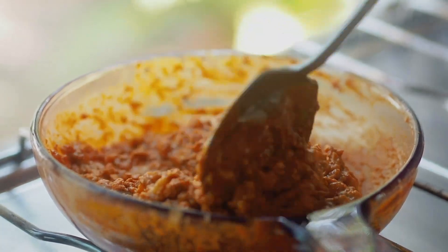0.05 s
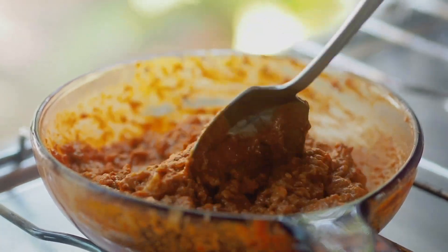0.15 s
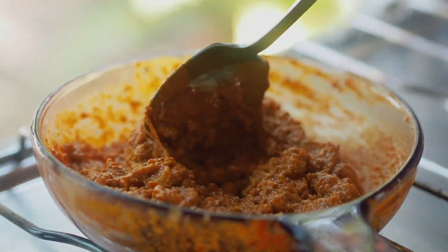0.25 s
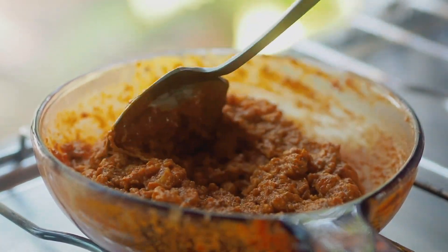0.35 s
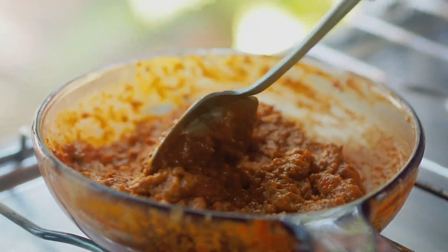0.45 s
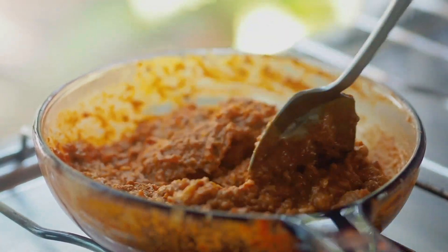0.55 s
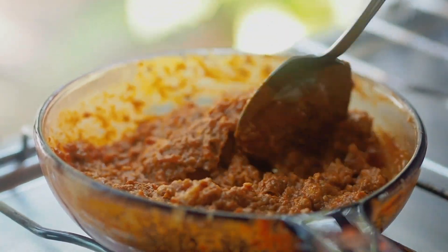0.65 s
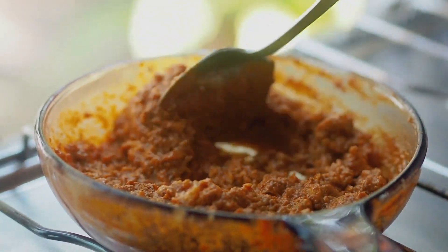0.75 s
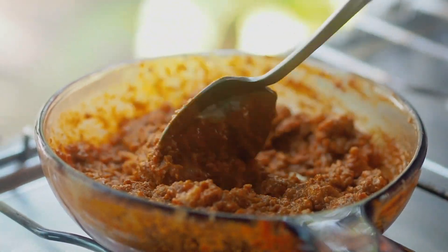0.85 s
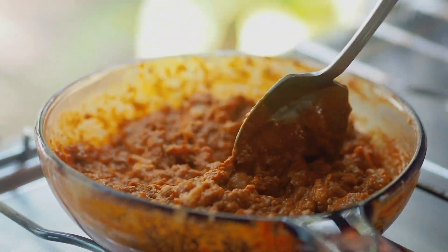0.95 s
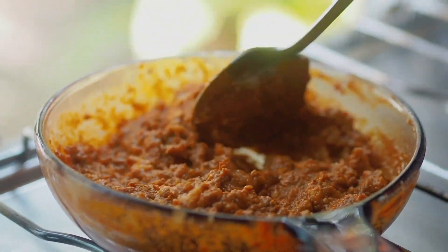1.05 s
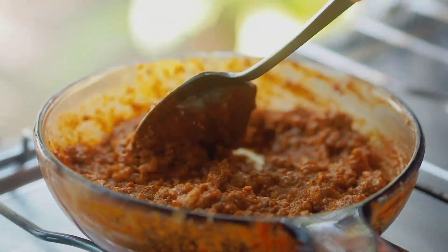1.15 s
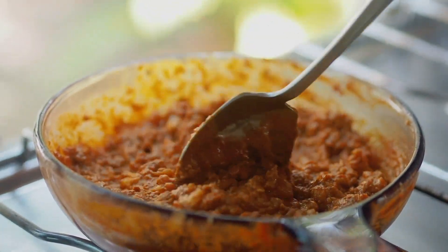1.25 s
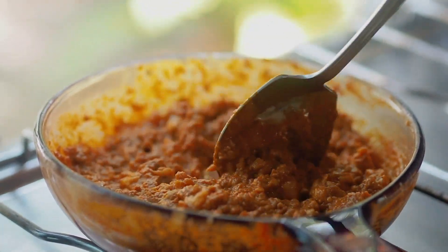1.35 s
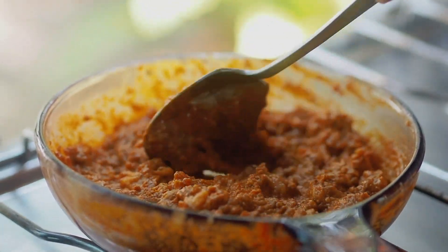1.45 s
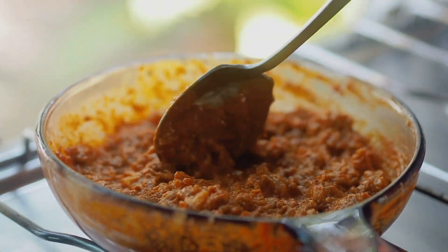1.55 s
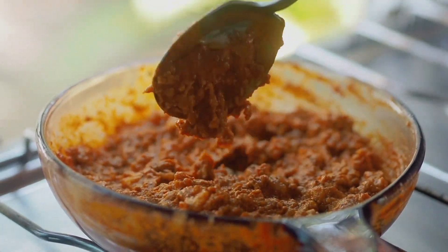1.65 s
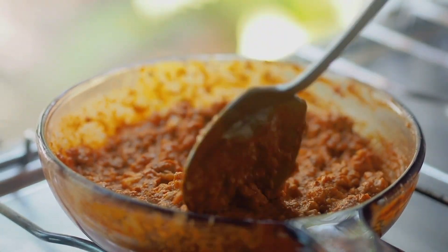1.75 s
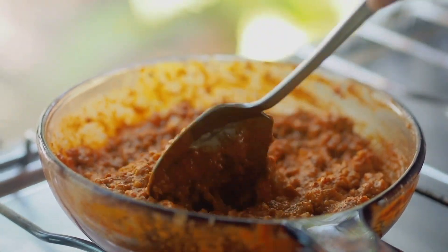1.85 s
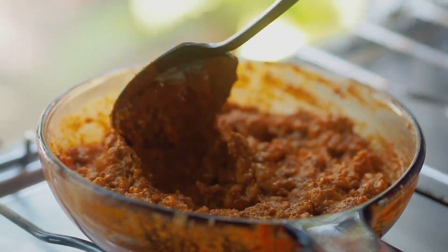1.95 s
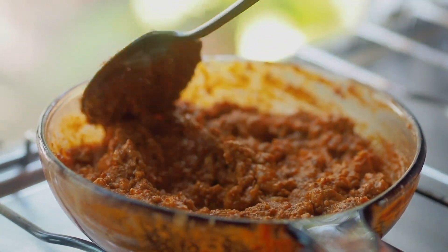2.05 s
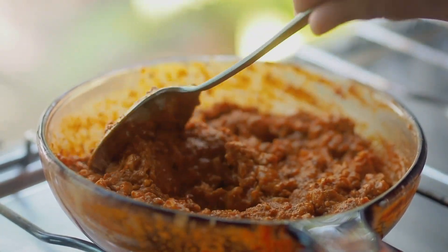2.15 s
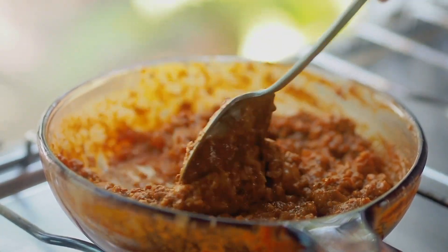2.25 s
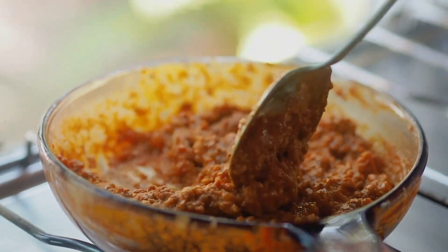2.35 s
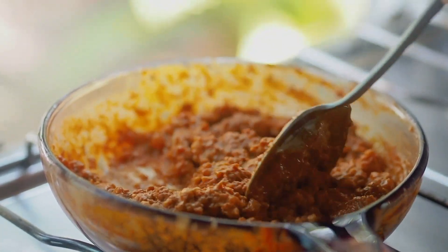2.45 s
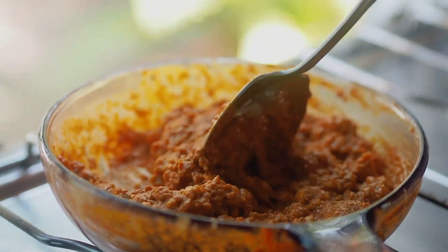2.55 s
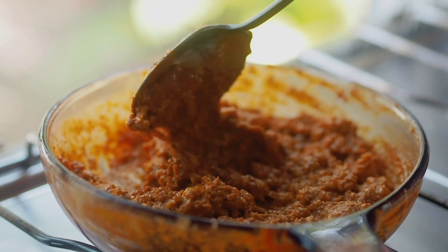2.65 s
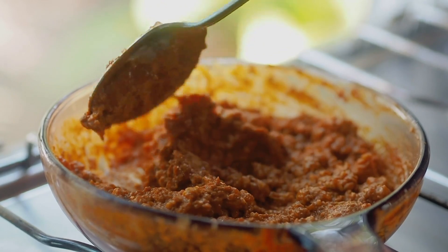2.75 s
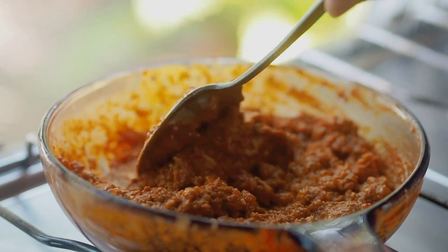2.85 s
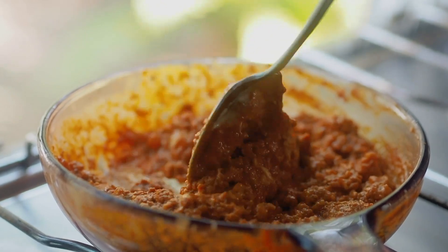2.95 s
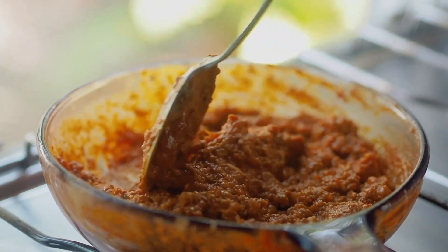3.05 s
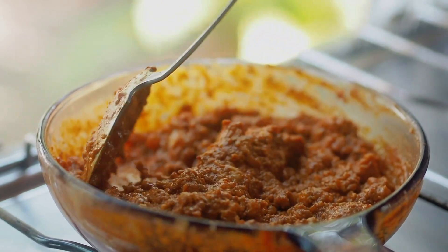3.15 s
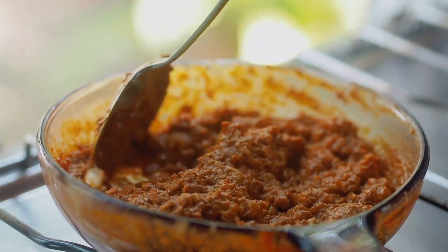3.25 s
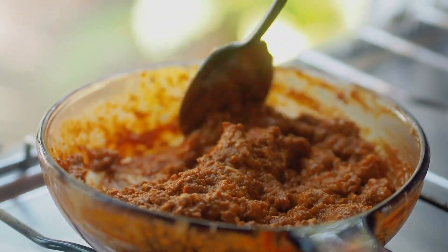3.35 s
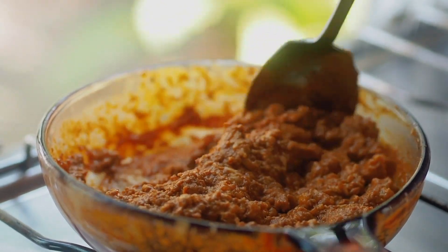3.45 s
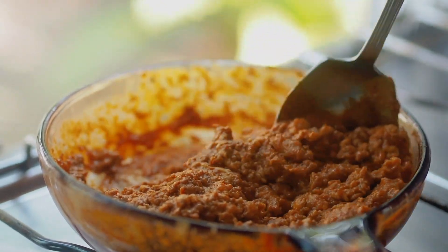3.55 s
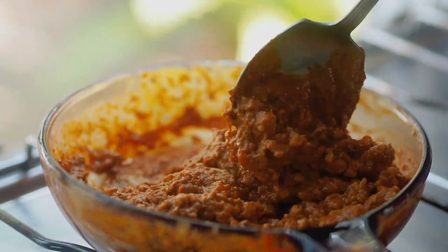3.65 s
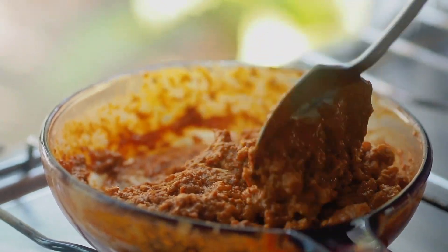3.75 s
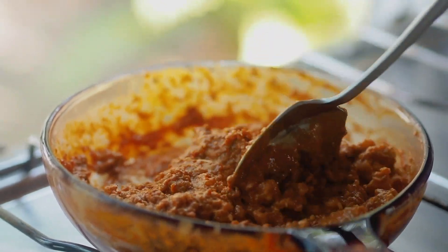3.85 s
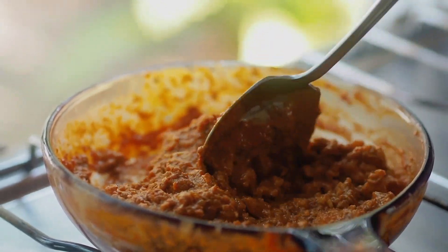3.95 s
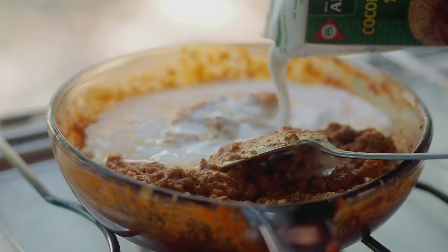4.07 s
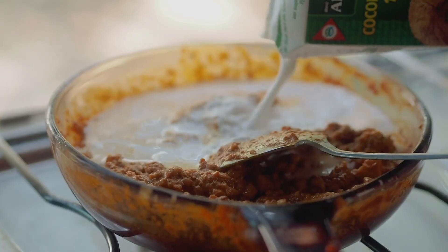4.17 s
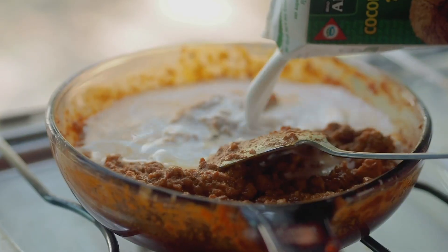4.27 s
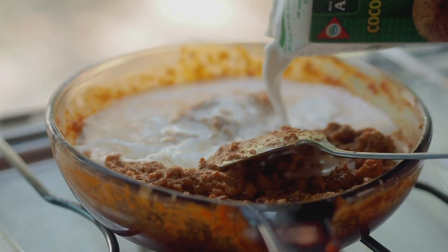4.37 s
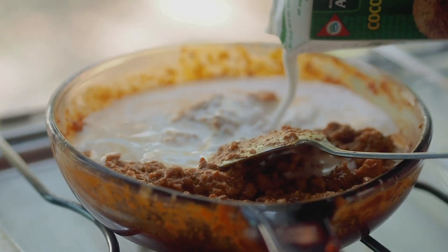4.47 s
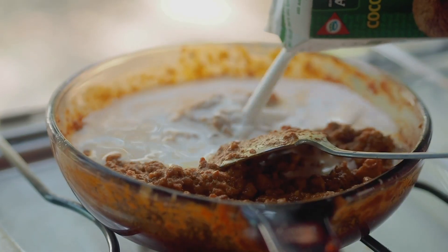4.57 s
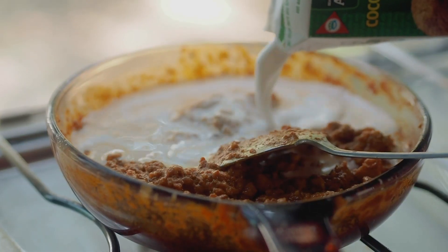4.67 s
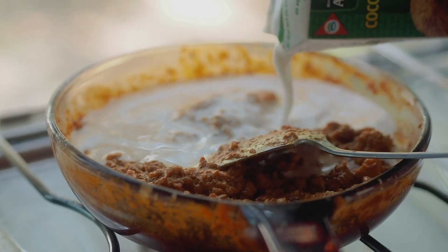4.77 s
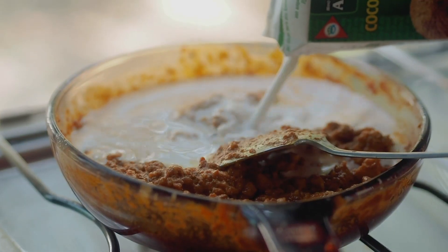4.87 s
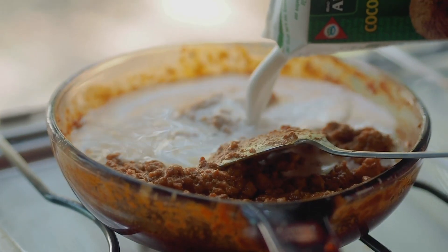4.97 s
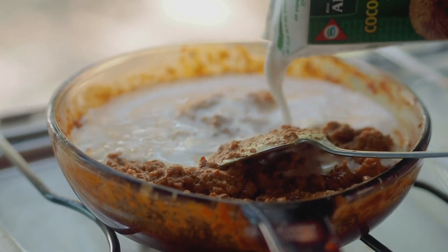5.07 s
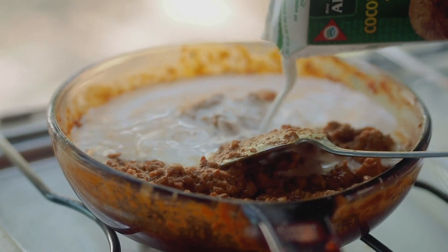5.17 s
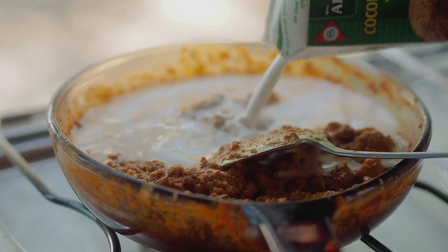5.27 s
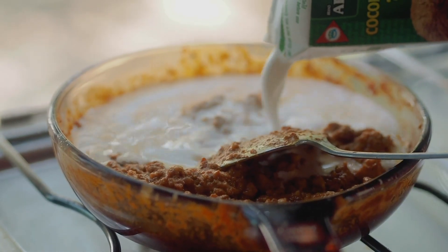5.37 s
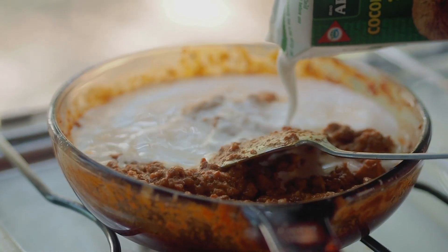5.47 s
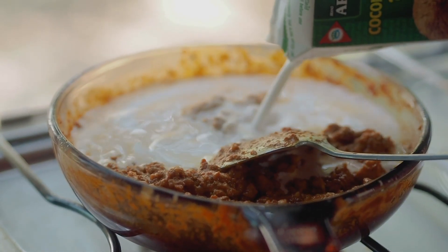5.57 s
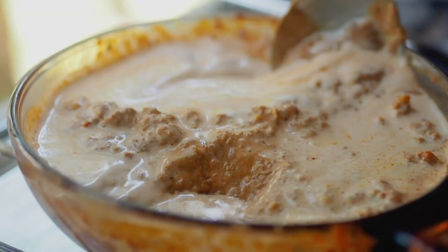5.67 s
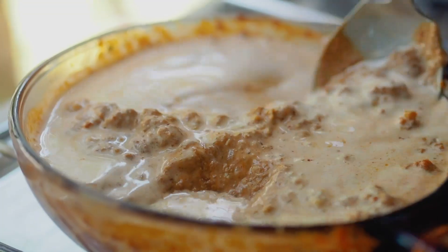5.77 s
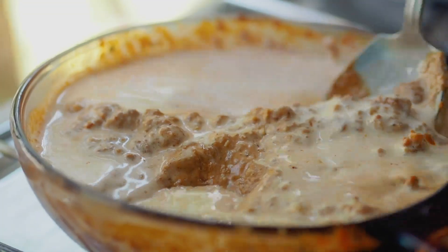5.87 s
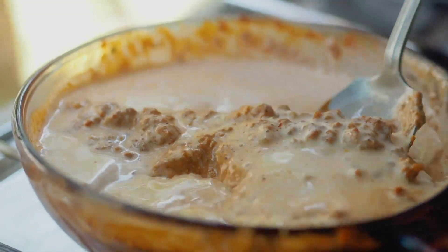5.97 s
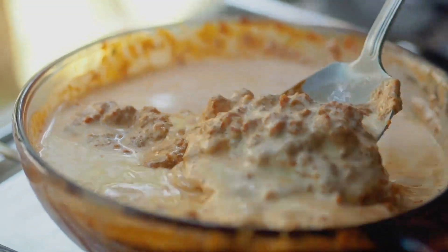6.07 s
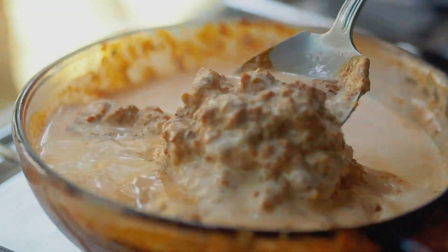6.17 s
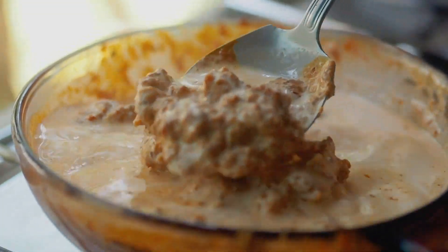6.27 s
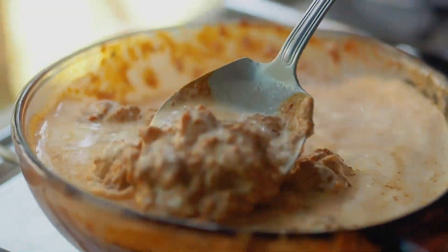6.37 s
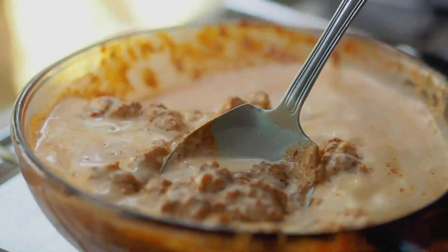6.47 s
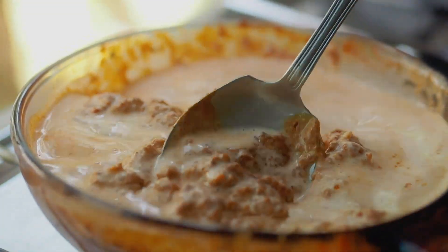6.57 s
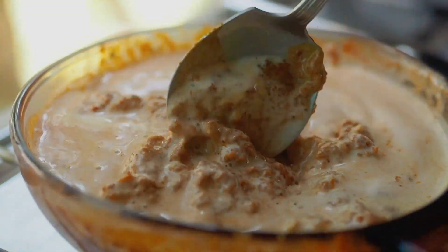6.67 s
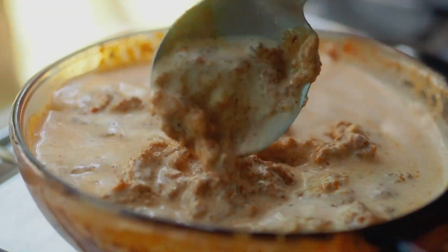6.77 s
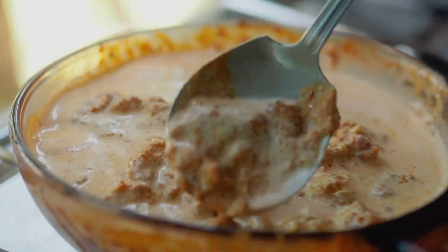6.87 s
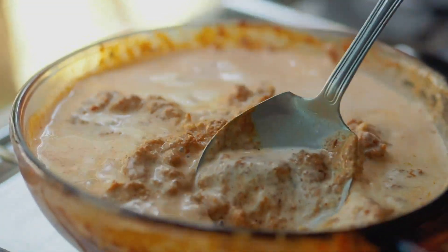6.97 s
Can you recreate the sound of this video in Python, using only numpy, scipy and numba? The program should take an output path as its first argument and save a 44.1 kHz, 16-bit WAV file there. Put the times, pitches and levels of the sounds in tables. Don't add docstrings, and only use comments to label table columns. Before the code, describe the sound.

In a small kitchen, closely heard in stereo, a gas burner hisses softly with a low flame rumble throughout. A metal spoon strikes a paste-filled glass bowl hard at 0.2 s, again at 0.4 and more softly at 0.6; the rings are bright but quickly damped, with a dull low thud. From 0.5 to 1.3 s, soft touches and gritty scrapes follow, with a squeak near 0.8. A bright double clank comes at 1.5, then strong knocks at 1.87, 2.17, 2.5 and 2.9, the 1.87 one especially thuddy, the last trailing a scrape. Weaker knocks fall at 3.25, a quick cluster at 3.5, and a light one at 3.9. Afterwards there is mostly burner hiss, with faint scrapes around 4.9, 5.3 and 6.4, barely audible touches at 5.5 and 5.8, and a tiny rim tick at 7.0. Room echo is short.

```python
import sys
import numpy as np
from scipy import signal
from scipy.fft import rfft, irfft, next_fast_len
from scipy.io import wavfile
from scipy.ndimage import map_coordinates
from numba import njit

SR = 44100
rng = np.random.default_rng(int(sys.argv[2]) if len(sys.argv) > 2 else 0)


def dump(signal):
    limited = np.clip(np.atleast_2d(signal).T, -1, 1)
    pcm = np.round(limited * 32767).astype(np.int16)
    wavfile.write(sys.argv[1], SR, pcm)


def field_ratio(decibels):
    return 10 ** (np.asarray(decibels, dtype=float) / 20)


N = 309582
DELAY_S = 0.0008
SIDES = np.array([[1], [-1]])


def rms_one(x):
    return x / np.sqrt(np.mean(x ** 2) + 1e-20)


def at_hz(points, hz):
    point_hz, point_db = np.transpose(points)
    return np.interp(np.log(hz), np.log(point_hz), point_db)


def drift(rate_hz):
    steps = rng.standard_normal(int(N / SR * rate_hz) + 3)
    return rms_one(map_coordinates(steps, [np.arange(N) / SR * rate_hz], order=3))


def band(x, low_hz, high_hz):
    edges = [low_hz, min(high_hz, 0.45 * SR)]
    return signal.sosfilt(signal.butter(2, edges, "band", fs=SR, output="sos"), x)


def high_pass(x, order, hz):
    return signal.sosfilt(signal.butter(order, hz, "high", fs=SR, output="sos"), x)


def decay(db, hz, t60_s, rise_s):
    t = np.arange(SR // 3) / SR
    envelope = field_ratio(db - 60 * t / t60_s) * (1 - np.exp(-t / rise_s))
    return envelope * np.sin(2 * np.pi * hz * t)


def dying_noise(rows, fall_s):
    t = np.arange(SR // 3) / SR
    return rng.standard_normal((rows, len(t))) * np.exp(-t / fall_s)


def add(out, s, sound):
    i = round(s * SR)
    out[i:i + len(sound)] += sound[:N - i]


def low_noise():
    return field_ratio([[-86], [-81]]) * rms_one(band(rng.standard_normal((2, N)), 36, 100))


# frequency_hz, likeness (0-1)
COHERENCE = [(60, 1), (180, 0.95), (550, 0.88), (1650, 0.63), (4970, 0.29), (15000, 0.02)]
# frequency_hz, difference_db
BALANCE = [(60, -0.5), (240, 0.5), (950, -0.5), (3770, -0.5), (15000, -2)]


def gas_noise(spectrum):
    size = next_fast_len(N)
    hz = np.maximum(np.arange(size // 2 + 1) * SR / size, 1)
    inside = (hz > spectrum[0][0]) & (hz < spectrum[-1][0])
    alike = np.clip(at_hz(COHERENCE, hz), 0, 1)
    mid, side = rfft(rng.standard_normal((2, size)))
    pair = np.sqrt(1 + alike) * mid + np.sqrt(1 - alike) * side * SIDES
    gain = inside * field_ratio(at_hz(spectrum, hz) + at_hz(BALANCE, hz) * SIDES / 2)
    return rms_one(irfft(gain * pair, size)[:, :N])


# time_s, level_db
GAS_FLOW = [
    (0, -1),
    (.3, 2),
    (2, 0.5),
    (4, 0),
    (5.2, -1),
    (5.6, .5),
    (7.02, 0),
]
# frequency_hz, density_db (dB per Hz)
FLAME_SPECTRUM = [(15, -50), (25, -19), (54, -23), (75, -23.5), (134, -11.5), (175, -3.5), (324, -18),
                  (357, -13), (386, -11.5), (589, -8.5), (818, -12), (1350, -13.5), (1570, -18.5),
                  (1840, -12), (2500, -18.5), (3250, -39), (5500, -120)]
# frequency_hz, density_db (dB per Hz)
JET_SPECTRUM = [(1470, -81), (2500, -8), (3290, -4), (3710, -4.5), (4920, -7), (5810, -1), (6230, -13.5),
                (7350, -10.5), (7890, -14.5), (9240, -8.5), (10600, -25), (11900, -10.5), (13700, -8),
                (16000, -20.5), (16400, -60)]


def burner():
    flow_db = np.interp(np.arange(N) / SR, *np.transpose(GAS_FLOW))
    flame = field_ratio(-58.5 + 0.17 * flow_db + 0.11 * drift(8.5)) * gas_noise(FLAME_SPECTRUM)
    jet = field_ratio(-54.5 + flow_db + 0.77 * drift(5))
    whistle_hz, half_width_hz = 5993, 130
    common, left, right = rng.standard_normal((3, N))
    mixed = common + 0.88 * np.array([left, right])
    whistle = rms_one(band(mixed, whistle_hz - half_width_hz, whistle_hz + half_width_hz))
    return flame + jet * (gas_noise(JET_SPECTRUM) + field_ratio(-7 + 0.5 * drift(3.9)) * whistle)


# low_hz, high_hz, level_db, t60_s, side_share (ratio, differs between the sides)
REVERBERATION = [
    (298, 1350, -11.5, 0.39, 0.31),
    (1600, 2820, -14, 0.19, 0.85),
    (3300, 5930, -15, 0.21, 0.78),
    (7650, 50000, -16.5, 0.2, 1.13),
]


def kitchen(x):
    t = np.arange(SR // 2) / SR
    response = np.zeros((2, len(t)))
    response[:, 0] = field_ratio([-0.4, 0.4])
    mid, side = rng.standard_normal((2, len(t)))
    response += field_ratio(-29) * band(side, 1200, 16000) * t / 0.00076 * np.exp(1 - t / 0.00088) * SIDES
    for k, (low_hz, high_hz, db, t60_s, side_share) in enumerate(REVERBERATION):
        noise = band(mid + side_share * side * SIDES, low_hz, high_hz)
        tail = noise * field_ratio(db - 20 - 60 * t / t60_s) * (1 - np.exp(-t / 0.0006))
        response += (-1) ** k * tail
    return signal.fftconvolve(x[None], response, axes=1)[:, :N]


# start_s, level_db
LOW_THUMPS = [
    (0.175, -32),
    (0.405, -50),
    (1.863, -68),
    (2.512, -65),
    (2.882, -49),
]


def thumps():
    out, t = np.zeros(N), np.arange(SR // 20) / SR
    push_s = 0.001
    for s, db in LOW_THUMPS:
        add(out, s + DELAY_S, -field_ratio(db - 3.5) * t / push_s * np.exp(1 - t / push_s))
    return out


# start_s, level_db
STAND_HUMS = [(0.202, -49), (0.663, -55), (1.128, -56.5), (1.88, -52), (2.19, -65.5), (2.529, -53),
              (2.568, -52.5), (2.907, -57), (3.279, -68), (3.557, -54)]


def stand():
    out = np.zeros(N)
    for s, db in STAND_HUMS:
        add(out, s, decay(db + 12, 368.3, 0.067, 0.0057))
    return out


LOW_MODES = [829, 739, 896, 989, 1060, 1147, 1337, 1470]
# start_s, level_db, pitch_hz, other_modes_db
BELLY_RINGS = [(0.176, -20.5, 1125, 1.5), (0.408, -26, 1125, -5.5), (0.627, -34.5, 903, 3.5),
               (0.775, -47, 1150, 0), (0.975, -35.5, 880, -11), (1.134, -34.5, 1096, -15),
               (1.502, -35, 980, -3.5), (1.531, -33, 1145, -2), (1.865, -18, 1170, 0),
               (2.176, -14.5, 1158, -10), (2.514, -22, 953, -7.5), (2.885, -27, 990, 0.5),
               (3.255, -31, 857, 5.5), (3.472, -26, 1118, -7.5), (3.503, -31, 1017, -1),
               (3.541, -34.5, 862, 0.5), (3.894, -41, 940, -1.5), (5.77, -42.5, 940, -2.5)]
# start_s, level_db, pitch_hz, t60_s
STRUCK_RINGS = [
    (.18, -26, 863, 0.076),
    (1.136, -32, 1155, 0.072),
    (1.502, -12, 2630, 0.036),
    (1.53, -17, 2586, 0.062),
    (2.885, -27.5, 1465, 0.044),
    (3.258, -29, 1950, 0.046),
    (3.258, -21, 2840, 0.044),
    (3.541, -31.5, 1877, 0.064),
    (3.891, -24, 2260, 0.022),
]
# start_s, level_db, pitch_hz, t60_s
DEEP_RINGS = [
    (1.868, -24.5, 700, 0.24),
    (1.87, -4, 804, 0.044),
    (2.174, -23.5, 625.5, 0.13),
    (2.515, -46, 765, 0.11),
    (2.882, -58, 650, 0.067),
    (3.259, -48, 776, 0.1),
    (3.475, -33, 693, 0.18),
]


def belly():
    out, hz = np.zeros(N), np.array(LOW_MODES)[:, None]
    strengths = rng.standard_normal((len(BELLY_RINGS), len(hz), 1))
    slaps = band(dying_noise(len(BELLY_RINGS), 0.0092), 554, 1020)
    for (s, db, ring_hz, others_db), strength, slap in zip(BELLY_RINGS, strengths, slaps):
        main = decay(db + 5, ring_hz, 0.028, 0.0035)
        others = np.sign(strength) * decay(db + others_db - 10 + 3 * np.abs(strength), hz, 0.056, 0.0027)
        add(out, s, main + others.sum(axis=0) + field_ratio(db + others_db) * slap)
    for s, db, ring_hz, t60_s in STRUCK_RINGS:
        add(out, s, decay(db, ring_hz, t60_s, 0.00097))
    for s, db, ring_hz, t60_s in DEEP_RINGS:
        add(out, s, decay(db - 7.5, ring_hz, t60_s, 0.0088))
    return high_pass(out, 6, 560)


@njit
def gliding(x, hz, r, rate):
    y = np.zeros(len(x))
    for i in range(2, len(x)):
        feedback = 2 * r * np.cos(2 * np.pi * hz[i] / rate) * y[i - 1] - r * r * y[i - 2]
        y[i] = x[i] - x[i - 2] + feedback
    return y


DEEP_STROKES = [(.448, -46, 2300, 0.0087, 0.28), (.584, -40, 2020, 0.043, .1),
                (.618, -42, 2020, 0.018, .005), (.667, -40, 2060, 0.0077, 0.028),
                (.748, -43.5, 2150, 0.042, 0.064), (.885, -40.5, 2930, 0.014, 0.11),
                (.915, -42, 2830, .08, .07), (.997, -44, 2180, .01, 0.06), (1.014, -42.5, 2080, .02, 0.031),
                (1.096, -36.5, 2040, 0.013, 0.025), (1.24, -38, 2880, 0.046, .05),
                (1.497, -34.5, 2740, 0.047, .004), (2.57, -37.5, 2380, .015, .1),
                (3.568, -45, 1940, 0.011, 0.086)]
DOWN_STROKES = [
    (.895, -53, 3300, .05, 0.04),
    (.812, -40.5, 5060, .03, 0.037),
    (.834, -31.5, 4220, 0.04, 0.035),
    (1.42, -51.5, 4480, 0.13, .05),
    (1.78, -47, 4740, 0.062, 0.071),
    (1.855, -47, 3840, 0.078, .008),
    (4.25, -56.5, 4040, .08, .2),
]
ALONG_STROKES = [
    (2.9, -30, 4150, .015, 0.24),
    (0.1515, -46, 4100, 0.038, .005),
    (.88, -36, 3980, .03, 0.045),
    (1.81, -40, 4100, 0.025, 0.39),
    (0.9, -46, 3100, .2, .06),
    (5.292, -42.5, 4150, 0.021, 0.091),
    (5.32, -48, 5100, .05, 0.13),
    (4.9, -51, 4050, 0.057, 0.07),
    (6.435, -46.5, 4360, 0.057, 0.15),
]
SINGING_STROKES = [
    (1.51, -39, 2640, .01, .08),
    (1.54, -39, 2550, .03, 0.12),
    (3.898, -64, 2140, .01, 0.041),
]


def scrapes(strokes, sag_hz_per_s, slips_per_s, width_hz, skirt_db, size_db):
    t, level, hz = np.arange(N) / SR, np.zeros(N), np.full(N, 3000.)
    for s, db, centre_hz, swell_s, fall_s in strokes:
        late = t - s
        away = np.where(late < 0, -late / swell_s, late / fall_s)
        gain = (away < 1.3) * field_ratio(db - 25 * away)
        on = gain > level
        level[on] = gain[on]
        hz[on] = np.clip(centre_hz - sag_hz_per_s * late[on], 1000, 8000)
    slip_sizes = field_ratio(size_db * rng.exponential(1, N).clip(0, 3)) * rng.choice([-1, 1], N)
    slips = (rng.random(N) < slips_per_s / SR) * slip_sizes
    r = np.exp(-np.pi * width_hz / SR)
    squeak = rms_one(gliding(gliding(slips, hz, r, SR), hz, r * r, SR))
    skirt = field_ratio(skirt_db) * rms_one(band(slips, 1700, 5800))
    judder = field_ratio(3 * drift(60))
    return level * judder * (squeak + skirt)


# start_s, level_db, upper_modes_db, top_modes_db, pitch_hz (strongest ring)
SPOON_KNOCKS = [(0.1752, -0.5, -3.5, -4, 2340), (0.408, -2, -10.5, -7.5, 2435),
                (0.626, -7, -13.5, -10, 2190), (1.501, -6, -13.5, -20.5, 2500),
                (1.8654, -5.5, 1.5, 2, 2460), (2.174, -6, 2.5, -6, 2830), (2.513, -4, -4, -4.5, 2390),
                (2.8824, -1, -6, 1, 3020), (3.2538, -9, -8, -7.5, 2080), (3.4711, -13, -13.5, -30, 3020),
                (3.5026, -17, -13, -15, 3300), (3.5358, -18.5, -10, -8.5, 3270),
                (3.5514, -21, -25, -12, 3310), (3.8912, -19.5, -10.5, -25, 2220),
                (3.3997, -42, -9, 4, 1990), (5.4858, -41.5, -7, 1.5, 2920), (5.759, -37.5, -6.5, -3, 2180),
                (6.454, -48, 10, -14, 3340), (6.985, -45, 4.5, 0, 2940)]


def approach():
    out, t = np.zeros(N), np.arange(-SR // 16, 0) / SR
    hisses = band(rng.standard_normal((len(SPOON_KNOCKS), len(t))), 1500, 6100)
    for (s, db, *_), hiss in zip(SPOON_KNOCKS, hisses):
        add(out, s + DELAY_S + t[0], field_ratio(db - 38) * hiss * np.exp(t / 0.014))
    return out


# start_s, level_db, pitch_hz (strongest ring)
SOFT_TOUCHES = [
    (.484, -28, 2180),
    (0.5324, -29.5, 2840),
    (0.574, -30, 2000),
    (0.7481, -29, 2040),
    (0.9736, -15.5, 2100),
    (1.0136, -40, 2220),
    (1.0787, -21, 2270),
    (1.1353, -27, 3070),
    (1.529, -10.5, 2650),
    (3.568, -25, 3120),
]
# pitch_hz, level_db, t60_s
GLASS_MODES = [(1552, 1.5, 0.12), (1902, 14, 0.043), (2030, -23, 0.014), (2300, 4, 0.052),
               (2585, 22, 0.011), (2830, 11, 0.04), (2980, 22.5, 0.011), (3537, 20.5, 0.0083),
               (3570, 22, .03), (4260, 16, 0.015), (4390, 5.5, 0.037), (4390, 9, 0.029), (4840, 17, 0.023),
               (5440, 11, 0.02), (6010, 17.5, 0.029), (6900, 2, 0.014), (7100, 19.5, 0.013),
               (6800, 20, .025), (8020, 10, 0.012), (8530, -34, 0.0068), (8400, -34, 0.027),
               (10470, 11, 0.054), (10900, 13, 0.03), (12260, 9, 0.041)]
# delay_s, level_db
REFLECTIONS = [
    (.0026, -17),
    (.0059, -13),
    (.0097, -18),
    (0.0125, -16),
]
# start_s, level_db, pitch_hz, width_hz
RIM_TICK = [
    (6.985, -26, 8750, 2450),
]


def knocks():
    out = np.zeros(N)
    hz, mode_db, t60_s = np.transpose(GLASS_MODES)[:, :, None]
    touches = [(s, db, -19, -30, ring_hz) for s, db, ring_hz in SOFT_TOUCHES]
    blows = [*SPOON_KNOCKS, *touches]
    chance = rng.standard_normal((len(blows), 3, len(GLASS_MODES), 1))
    bursts = field_ratio(-9) * dying_noise(len(blows), 0.0037)
    bursts[:, 0] = field_ratio(16)
    for (s, db, upper_db, top_db, ring_hz), (strength, detune, sign), burst in zip(blows, chance, bursts):
        colour = [(1.25 * ring_hz, 0), (1.45 * ring_hz, upper_db), (6200, upper_db), (6800, top_db)]
        levels_db = mode_db + at_hz(colour, hz) + 2.5 * strength - 29
        rings = np.sign(sign) * decay(levels_db, hz * (1 + 0.01 * detune), np.minimum(t60_s, 0.016), 0.0002)
        strongest = decay(-11, ring_hz, 0.012, 0.0001)
        strongest += decay(upper_db - 8.5, 4130, 0.012, 0.00018)
        crack = field_ratio(-3 + upper_db / 3) * band(burst, 1700, 1.35 * ring_hz)
        crack += band(burst, ring_hz / 1.2, ring_hz * 1.2)
        crack -= field_ratio(upper_db) * band(burst, 1.35 * ring_hz, 6500)
        crack += field_ratio(top_db - 4) * band(burst, 7170, 9210)
        crack -= field_ratio(top_db - 12) * band(burst, 8600, 14200)
        sound = field_ratio(db) * (rings.sum(axis=0) + strongest + crack)
        add(out, s + DELAY_S, sound)
        for (late_s, echo_db), shift in zip(REFLECTIONS, detune[:, 0]):
            add(out, s + DELAY_S + late_s * (1 + 0.06 * shift), field_ratio(echo_db) * sound)
    for s, db, tick_hz, width_hz in RIM_TICK:
        burst = dying_noise(1, 0.0015)[0]
        tick = band(burst, tick_hz - width_hz / 2, tick_hz + width_hz / 2)
        add(out, s + DELAY_S, field_ratio(db + 9) * tick)
    return high_pass(out, 4, 1500)


def scene():
    deep = scrapes(DEEP_STROKES, 540, slips_per_s=2400, width_hz=510, skirt_db=-19.5, size_db=6)
    down = scrapes(DOWN_STROKES, 12400, slips_per_s=4200, width_hz=200, skirt_db=-33, size_db=9.5)
    along = scrapes(ALONG_STROKES, 0, slips_per_s=4500, width_hz=680, skirt_db=-11, size_db=2)
    singing = scrapes(SINGING_STROKES, 270, slips_per_s=9000, width_hz=100, skirt_db=-41, size_db=15)
    friction = field_ratio(-3.5) * (deep + down + along + singing)
    bowl = approach() + knocks() + belly() + stand() + friction
    return kitchen(bowl) + thumps() + burner() + low_noise()


def roll_off(x):
    return signal.sosfilt(signal.butter(12, 16570, fs=SR, output="sos"), x)


def record(dry):
    loud = np.clip(dry - 0.0008, -1, 1)
    mix = signal.sosfilt(signal.cheby2(10, 40, 16800, fs=SR, output="sos"), loud)
    return roll_off(mix)


dry = scene()
out = record(dry)
dump(out)
```